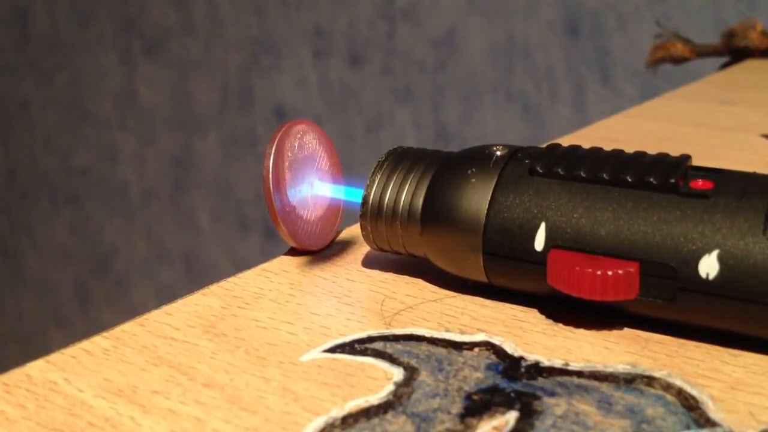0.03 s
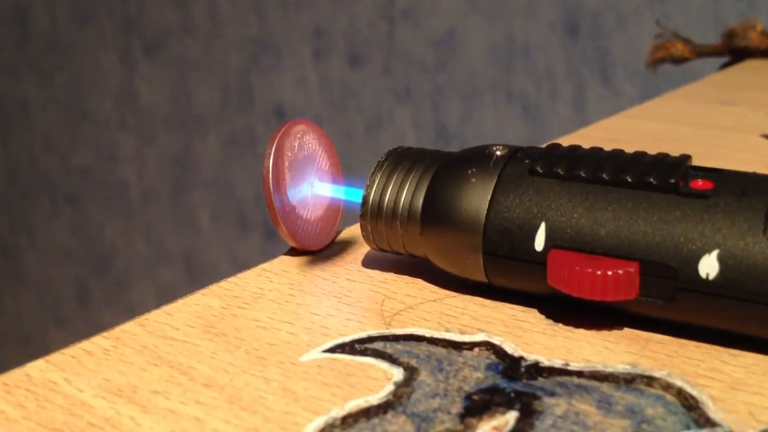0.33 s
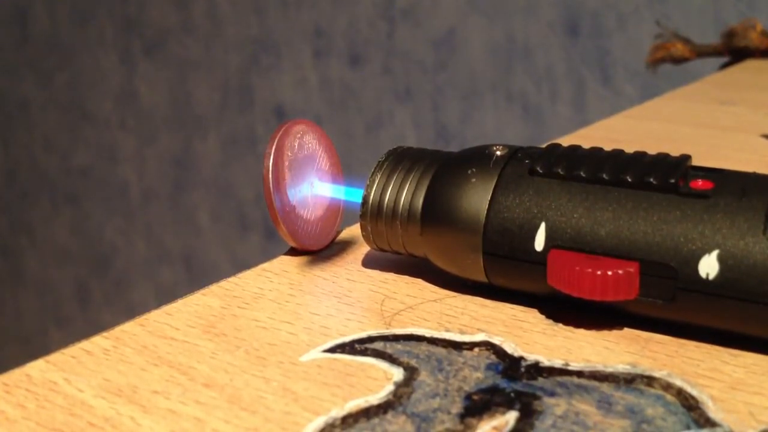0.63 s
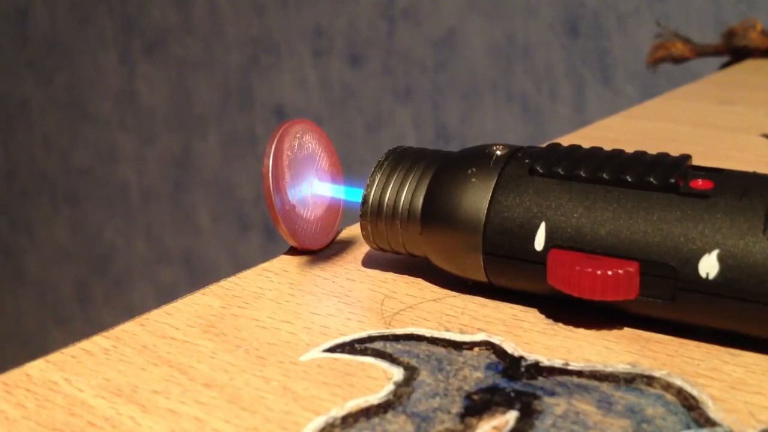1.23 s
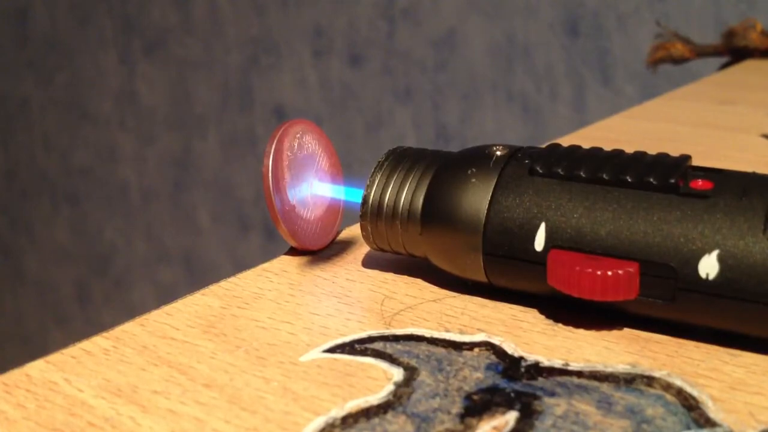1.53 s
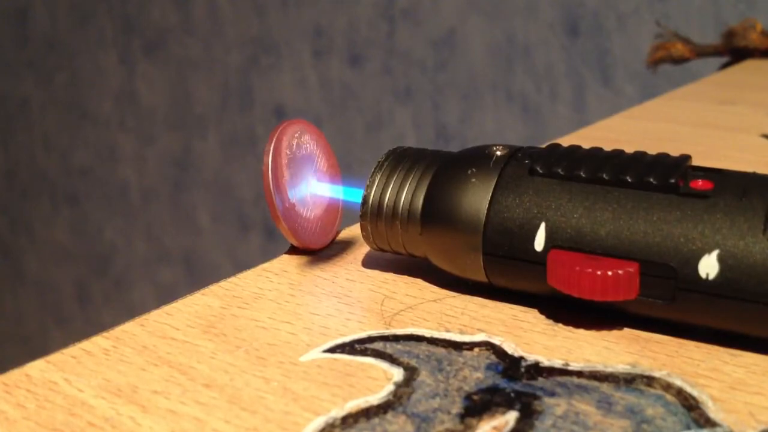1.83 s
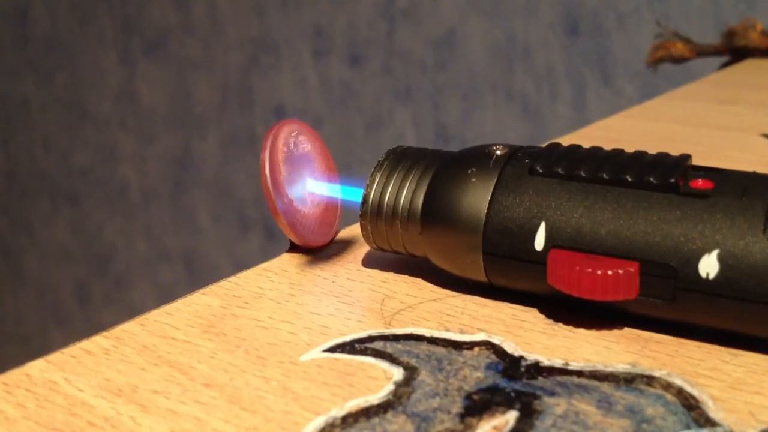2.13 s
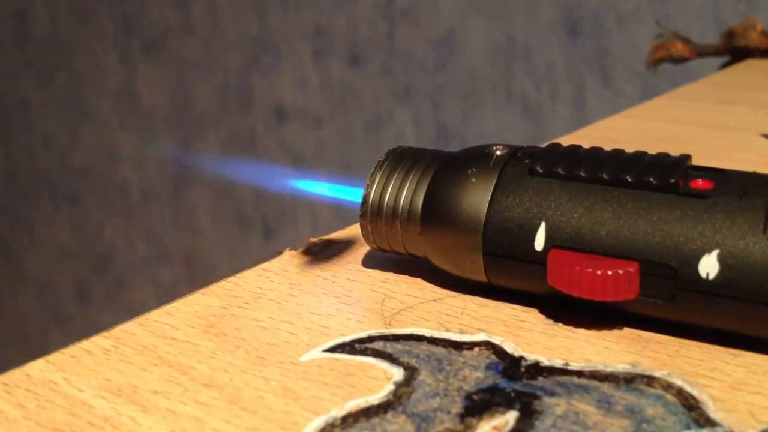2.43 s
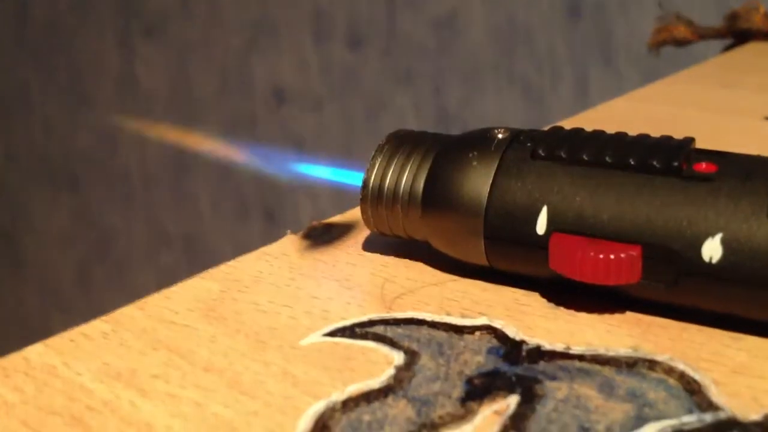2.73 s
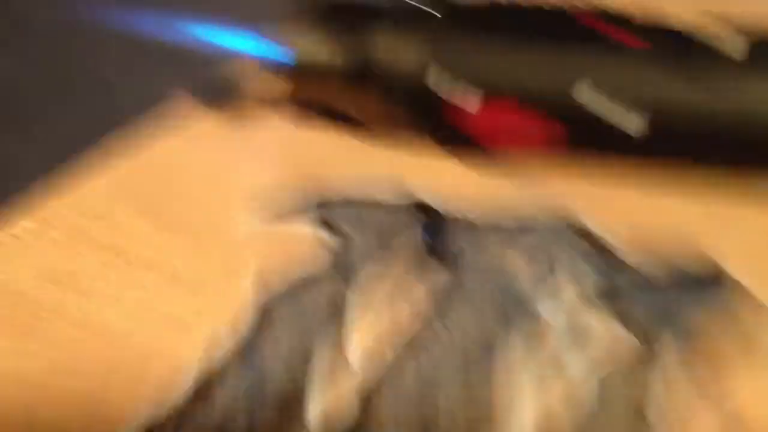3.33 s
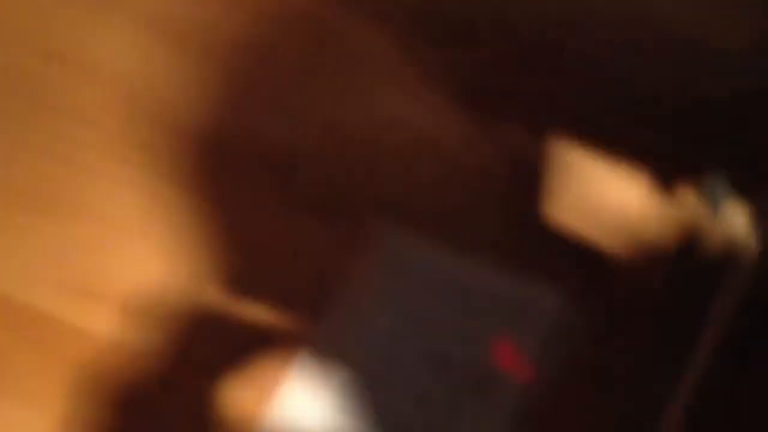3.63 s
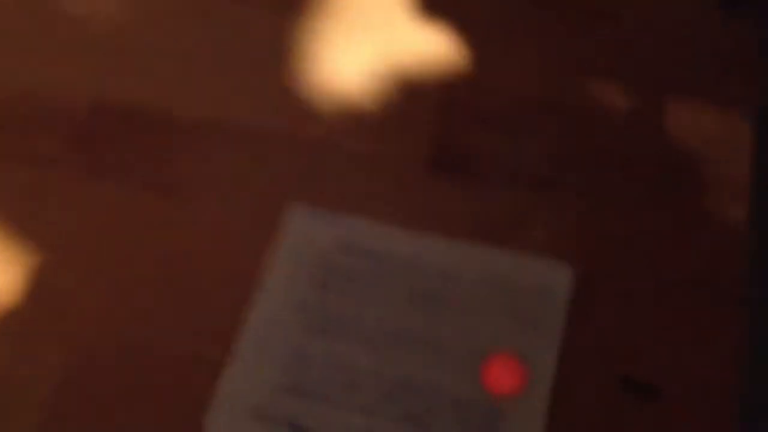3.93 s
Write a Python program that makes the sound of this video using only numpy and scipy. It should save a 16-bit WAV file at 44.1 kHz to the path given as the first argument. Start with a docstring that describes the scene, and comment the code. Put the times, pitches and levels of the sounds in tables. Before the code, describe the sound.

A butane torch roars and hisses against a coin, close by in a small room. The coin falls with a brief clink, a knock and scuffs follow on the wooden table, then fingers bump and rub the microphone.

```python
"""A jet torch on a coin

A butane torch roars close by, its flame hissing against a coin standing on a wooden table in a small
room. The coin tips out of the flame and lands with a clink. A knock and a few scuffs follow on the
table. Then the microphone is picked up and turned away, with bumps, clicks and rubs on its housing."""
import sys
import numpy as np
from scipy import signal
from scipy.fft import rfft, irfft
from scipy.io import wavfile

SR = 44100
rng = np.random.default_rng(int(sys.argv[2]) if len(sys.argv) > 2 else 0)


def store_wav(level_fs):
    """Save 16-bit WAV to argv[1]."""
    pcm = np.round(np.clip(np.atleast_2d(level_fs), -1, 1) * 32767)
    wavfile.write(sys.argv[1], SR, pcm.T.astype(np.int16))


N = 176400
T = np.arange(N) / SR

# How loud each steady noise is over time. Each row: time in seconds, level in dB.
RUMBLE_LEVELS = [(3.44, -94), (3.49, -57), (3.55, -64), (3.63, -61), (3.68, -65), (3.76, -68), (3.82, -55),
                 (3.88, -49), (3.94, -37.5), (3.975, -39), (4.0, -47)]
ROAR_LEVELS = [(0, -43), (2.2, -43.5), (2.5, -44.5), (3.3, -44), (3.42, -45), (3.52, -52), (3.68, -48.5),
               (4, -52)]
FLAME_ON_COIN_LEVELS = [(0, -37.5), (.85, -38), (1.4, -38), (1.85, -39.5), (2.15, -43), (2.3, -56),
                        (2.4, -70), (2.5, -100)]
NOZZLE_LEVELS = [(0, -43.5), (1.2, -42.5), (2.1, -41), (2.4, -43), (3.1, -44), (3.49, -43.5), (3.54, -52),
                 (3.82, -53), (3.95, -50)]
# The tone of each sound, from bass to treble. Each row: frequency in Hz, relative level in dB.
RUMBLE_TONE = [(25, -42), (70, -29), (150, -1), (230, 1.5), (340, 0), (600, -14), (1500, -42)]
CLICK_TONE = [(40, -39), (200, -8), (800, 8.5), (1800, -0.5), (3000, 2.5), (4300, 3.5), (5600, -14),
              (7500, -9), (10000, -24), (15000, -20)]
RUB_TONE = [(35, -42), (117, -22), (200, -14.5), (500, -6), (800, -0.5), (1450, -8), (2150, -6),
            (2500, -7.5), (3400, -4), (4100, -2), (4700, -13), (5430, -25), (7400, -15), (9800, -30.5),
            (11600, -31), (13100, -29), (15000, -33)]
SCUFF_TONE = [(60, -35), (200, -15.5), (450, -7), (720, -11), (1000, -3), (1300, -5.5), (1700, -2.5),
              (2400, 0), (2950, 1), (4400, -2), (5350, -12.5), (7000, -2), (8200, -4.5), (9600, -22),
              (15000, -12)]
KNOCK_TONE = [(40, -42), (110, -19), (260, -3.5), (400, -7.5), (600, -14), (850, 2), (1150, 2.5),
              (1450, -5.5), (1850, -1), (2300, -3.5), (2800, -12), (4100, -8), (4900, -20), (7600, -11),
              (10000, -30.5), (15000, -26)]
CLINK_TONE = [(60, -82), (300, -33), (1000, -19), (2200, -4), (3800, 4), (5000, -12), (6800, 2), (8200, 0),
              (9800, -8), (15000, -35)]
ROAR_TONE = [(25, -16), (60, -15), (95, -28), (135, -16), (200, -5), (290, -7.5), (430, 1), (950, 1),
             (2200, 0), (3200, -0.5), (4200, -2.5), (5200, -8), (7200, -5), (8100, -11.5), (9500, -19),
             (14000, -46)]
FLAME_ON_COIN_TONE = [(1500, -31.5), (2200, -7.5), (2750, -10), (3100, -2), (4200, -3), (5200, -7),
                      (6000, -3), (7450, -7), (7800, -26), (8500, -17), (9200, -28.5), (10500, -20),
                      (15000, -23)]
NOZZLE_TONE = [(7000, -42), (9300, -41), (10200, -9), (11100, -6.5), (12100, 2), (13300, -1), (14500, 4.5),
               (15300, -1)]
# Pitches boosted or cut by the housing, the scuffed table, and the torch's nozzle and burner tube. # Each row:
# frequency in Hz, boost or cut in dB, width in Hz.
HOUSING_BANDS = [(656, 7, 38), (802, 5, 81)]
SCUFF_BANDS = [(445, 7, 51), (1520, 4.5, 98), (1695, 2.5, 54), (2112, 8.5, 74), (2960, 3.5, 82),
               (3730, 6, 81)]
TORCH_BANDS = [(725, -0.5, 23), (945, 4.5, 91), (1510, 2, 180), (1783, -5, 86), (1970, 2, 280),
               (2440, -4, 260), (3090, 3.5, 57), (3944, -14.5, 75), (4090, 2, 96), (5260, -9, 530),
               (6510, -9, 190), (7760, -16, 160), (8130, -7, 120)]
# The housing clicks, the knock rattles, the coin bounces. Each row: time in seconds, level in dB.
HOUSING_CLICKS = [(3.628, -8), (3.6365, -14), (3.6388, -8.5), (3.6443, -4.5), (3.679, -32), (3.70, -15.5)]
KNOCK_CONTACTS = [(2.7087, -5), (2.7097, 6.5), (2.7131, -2.5), (2.7194, -3), (2.7204, -10), (2.7235, -12),
                  (2.7288, -4), (2.732, -23)]
COIN_BOUNCES = [(2.393, -12.5), (2.3955, -15), (2.398, -15), (2.4002, -20), (2.4025, -22)]
# The notes at which the table and the coin ring.
# Each row: pitch in Hz, level in dB, seconds to fade by 60 dB.
TABLE_NOTES = [(268.5, -40.5, 0.16), (837, -35.5, .12), (923, -47, 0.13), (1107, -52, 0.095),
               (1130, -37, 0.11), (1713, -44, .12), (3620, -41, .08), (3940, -41, .09), (4150, -46, 0.1)]
COIN_NOTES = [(2550, -28, 0.072), (3800, -28, .025), (7120, -19, .012), (8060, -22, 0.0096)]
# Fingers bump the housing. Each row: start in seconds, peak level in dB, pitch in Hz.
FINGER_BUMPS = [(3.527, -40, 168), (3.547, -35.5, 150), (3.567, -52, 140), (3.585, -33, 186),
                (3.631, -35, 152), (3.6421, -20.5, 153), (3.698, -37.5, 262)]
# Fingers rub the housing. Each row: start and length in seconds, level in dB, rise and fade in seconds.
FINGER_RUBS = [(3.702, 0.058, -29, 0.0095, 0.018), (3.833, 0.055, -36, 0.031, .01),
               (3.877, 0.056, -29.5, 0.017, 0.016), (3.94, 0.024, -26.5, 0.0065, .016)]
# Slides on the table. Each row: start and length in seconds, level in dB, treble limit in Hz.
TABLE_SCUFFS = [(2.861, 0.021, -25.5, 14000), (3.204, 0.0064, -23, 8300), (3.216, 0.011, -29.5, 9000),
                (3.256, 0.032, -38, 8100), (3.325, 0.023, -42, 8100)]


def from_db(db):
    """Turn decibels into a number to multiply by."""
    return 10 ** (np.asarray(db) / 20)


def unit_power(x):
    """Scale a signal so its average power is 1."""
    return x / np.sqrt(np.mean(x ** 2) + 1e-20)


def drift(rate_hz):
    """A slow, random wobble."""
    r = np.exp(-2 * np.pi * rate_hz / SR)
    return unit_power(signal.lfilter([1], [1, -2 * r, r * r], rng.standard_normal(N + SR))[SR:])


def colour(x, tone):
    """Give a sound the bass and treble of a tone table."""
    size = 2 * N
    hz, db = np.transpose(tone)
    frequencies = np.arange(N + 1) * SR / size
    gain = from_db(np.interp(np.log(frequencies + 1), np.log(hz), db))
    # these steps make the filter ring only after a hit, never before it
    cepstrum = irfft(np.log(unit_power(gain)))
    cepstrum[1:N] *= 2
    cepstrum[N + 1:] = 0
    return irfft(rfft(x, size) * np.exp(rfft(cepstrum)))[:N]


def peaks_and_dips(x, bands):
    """Boost or cut each band of pitches in turn."""
    for hz, db, width_hz in bands:
        gain = from_db(db / 2)
        k = np.pi * width_hz / SR
        c = -2 * np.cos(2 * np.pi * hz / SR)
        x = signal.lfilter([1 + k * gain, c, 1 - k * gain], [1 + k / gain, c, 1 - k / gain], x)
    return x


def noise(tone, levels):
    """Noise with a set tone and a changing loudness."""
    return colour(rng.standard_normal(N), tone) * from_db(np.interp(T, *np.transpose(levels)))


def clicks(hits):
    """One sharp spike for each hit."""
    out = np.zeros(N)
    for start, db in hits:
        out[int(start * SR)] += from_db(db)
    return out


def ring(hits, notes):
    """Every hit sets an object's notes ringing, each with a slightly random strength."""
    out = np.zeros(N)
    for hz, db, fade_s in notes:
        decay = from_db(-60 / (fade_s * SR))
        angle = 2 * np.pi * hz / SR
        struck = clicks([(start, hit_db + db + rng.normal(0, 1)) for start, hit_db in hits])
        feedback = [1, -2 * decay * np.cos(angle), decay * decay]
        out += signal.lfilter([0, np.sin(angle)], feedback, struck + 1e-18)
    return out


def scatter(x, delay_s=0.00022, share=0.55):
    """Echoes inside a struck object smear each hit over a millisecond or two."""
    for ratio in (1, 1.7, 2.9):
        taps = np.r_[-share, np.zeros(int(delay_s * ratio * SR)), 1]
        x = signal.lfilter(taps, taps[::-1], x)
    return x


def friction(slips_per_s, spread_db):
    """Sliding surfaces make many tiny slips of uneven size."""
    sizes = from_db(spread_db * np.minimum(rng.exponential(1, N), 4))
    signs = rng.choice([-1, 1], N)
    slipping = rng.random(N) < slips_per_s / SR
    return unit_power(sizes * signs * slipping)


def stroke(start, length, rise, fade):
    """The strength of one slide: it rises, holds, then dies away."""
    return np.clip((T - start) / rise, 0, 1) * np.exp(-np.maximum(T - start - length, 0) / fade)


def room(x, echo_db, fade_s=0.24, build_s=0.0052):
    """The small room adds a short wash of echoes."""
    t = T[:SR // 2]
    tail = rng.standard_normal(len(t)) * from_db(-60 * t / fade_s) * (1 - np.exp(-t / build_s))
    return x + from_db(echo_db) * signal.fftconvolve(x, tail / np.linalg.norm(tail))[:N]


def handling(bump_rise_s=0.0025):
    """Fingers click, bump and rub on the microphone's housing, which rumbles. There is no room echo."""
    out = scatter(colour(clicks(HOUSING_CLICKS), CLICK_TONE)) + noise(RUMBLE_TONE, RUMBLE_LEVELS)
    for start, db, hz in FINGER_BUMPS:
        age = np.maximum(T - start, 0)
        swell = age / bump_rise_s * np.exp(1 - age / bump_rise_s)
        out += from_db(db) * swell * np.sin(2 * np.pi * hz * age)
    rub_power = sum((from_db(db) * stroke(start, length, rise, fade)) ** 2
                    for start, length, db, rise, fade in FINGER_RUBS)
    rubs = np.sqrt(rub_power) * friction(slips_per_s=7000, spread_db=2.0)
    return out + peaks_and_dips(colour(rubs, RUB_TONE), HOUSING_BANDS)


def scuffs(rise_s=0.002, fade_s=0.0043):
    """Short gritty slides on the table, some duller than others."""
    grit = friction(slips_per_s=3600, spread_db=3.5)
    out = np.zeros(N)
    for start, length, db, top_hz in TABLE_SCUFFS:
        slide = from_db(db) * grit * stroke(start - rise_s / 2, length, rise_s, fade_s)
        out += signal.sosfilt(signal.butter(2, top_hz, fs=SR, output="sos"), slide + 1e-18)
    return room(peaks_and_dips(colour(out, SCUFF_TONE), SCUFF_BANDS), echo_db=-6)


def knock():
    """Something hits the table with a hard crack and rattles; the table top rings."""
    crack = scatter(colour(clicks(KNOCK_CONTACTS), KNOCK_TONE))
    return room(crack, echo_db=-4) + ring(KNOCK_CONTACTS, TABLE_NOTES)


def coin():
    """The coin falls flat in a quick run of bright bounces; its own notes ring briefly and soon die away."""
    clink = colour(clicks(COIN_BOUNCES), CLINK_TONE)
    return room(clink + ring(COIN_BOUNCES, COIN_NOTES), echo_db=-15.5)


def torch(turn_start_s=3.28, turn_length_s=0.12, turned_edge_hz=10300):
    """The swirling flame roars, and hisses on the coin until it tips; the gas nozzle hisses higher."""
    flutter_db = drift(rate_hz=14)  # one gas flow makes all three flutter together
    roar = noise(ROAR_TONE, ROAR_LEVELS) * from_db(flutter_db)
    on_coin = noise(FLAME_ON_COIN_TONE, FLAME_ON_COIN_LEVELS) * from_db(0.99 * flutter_db)
    nozzle = noise(NOZZLE_TONE, NOZZLE_LEVELS) * from_db(flutter_db)
    # once turned away, the microphone hears only the highest part of the nozzle's hiss
    turned = np.clip((T - turn_start_s) / turn_length_s, 0, 1)
    top = signal.sosfiltfilt(signal.butter(4, turned_edge_hz, "high", fs=SR, output="sos"), nozzle)
    return peaks_and_dips(roar + on_coin, TORCH_BANDS) + (1 - turned) * nozzle + turned * top


def scene():
    """All the sounds add up in one channel."""
    return (torch() + coin() + knock() + scuffs() + handling())[None]


def record(dry, low_cut_hz=121, high_cut_hz=15230):
    """The small microphone loses the deep bass; the highest treble is cut sharply."""
    thin = signal.sosfilt(signal.butter(2, low_cut_hz, "high", fs=SR, output="sos"), dry)
    return signal.sosfilt(signal.ellip(12, .1, 80, high_cut_hz, fs=SR, output="sos"), thin)


dry = scene()
out = record(dry)
store_wav(out)
```